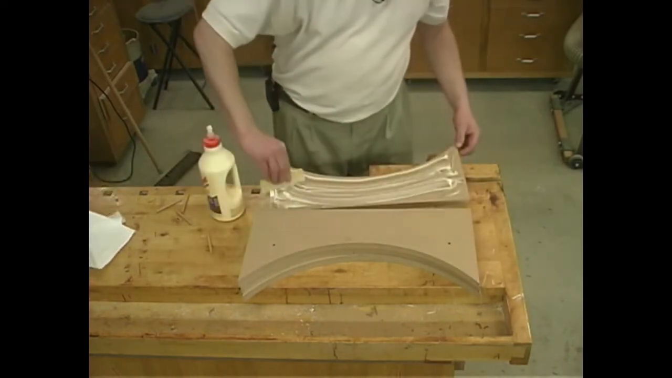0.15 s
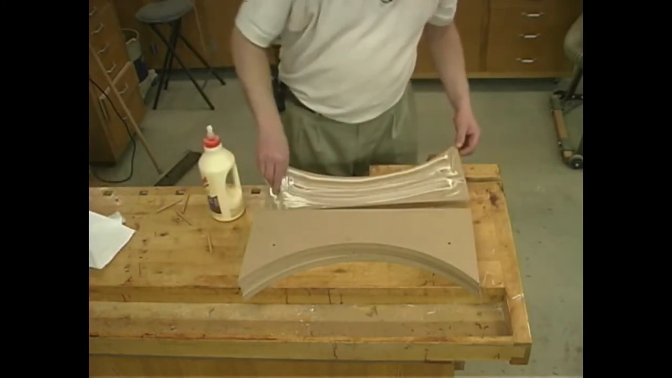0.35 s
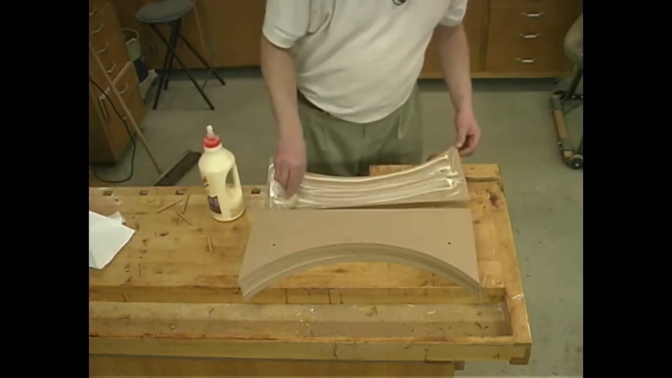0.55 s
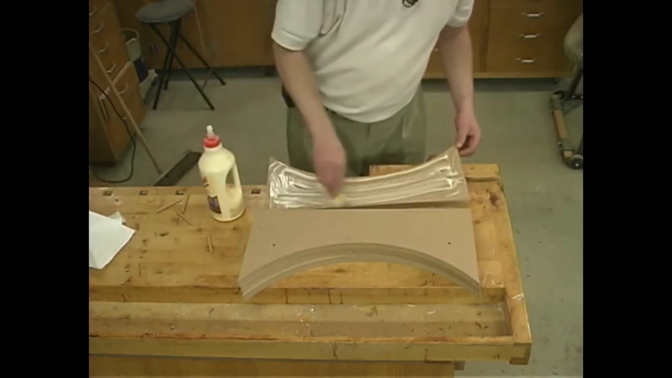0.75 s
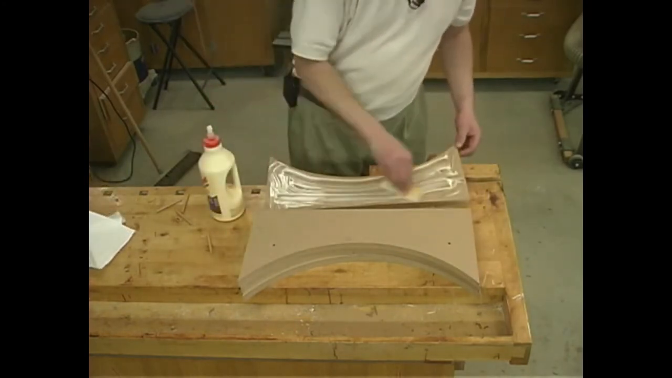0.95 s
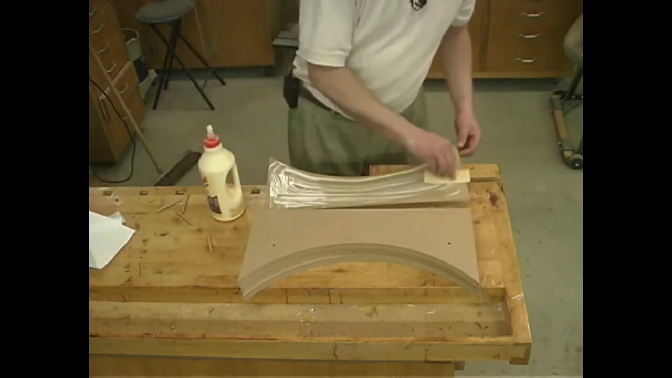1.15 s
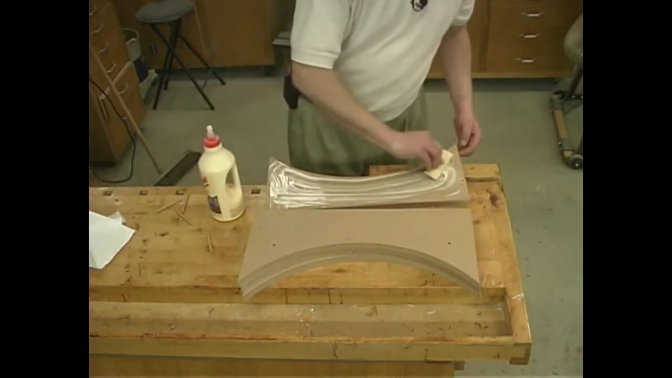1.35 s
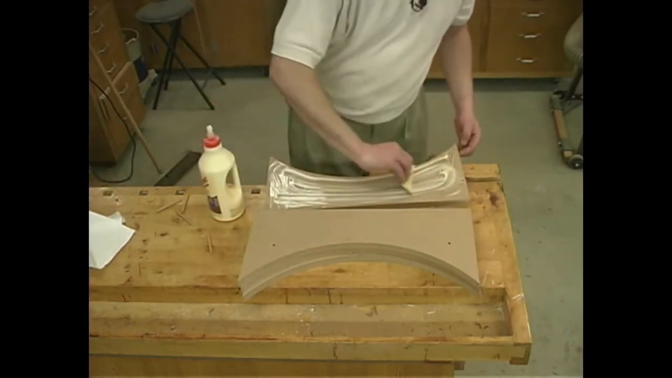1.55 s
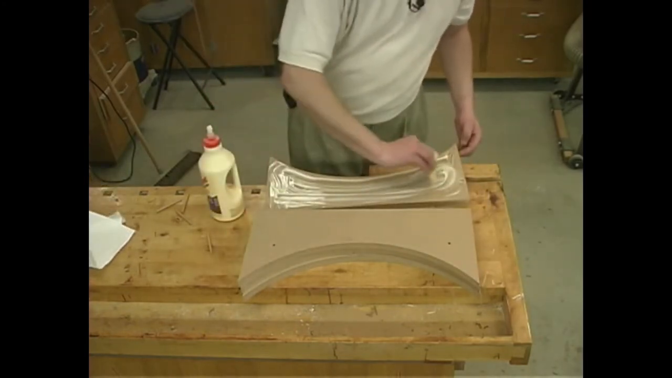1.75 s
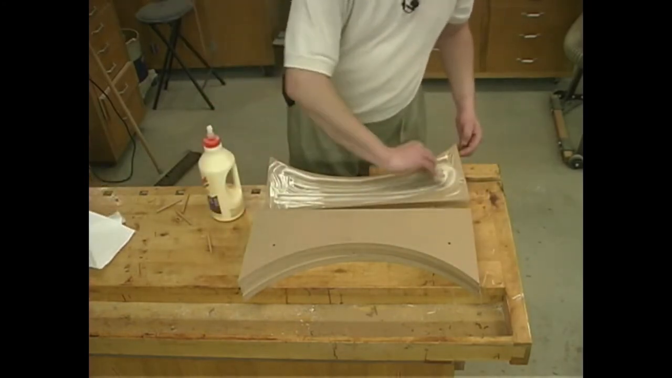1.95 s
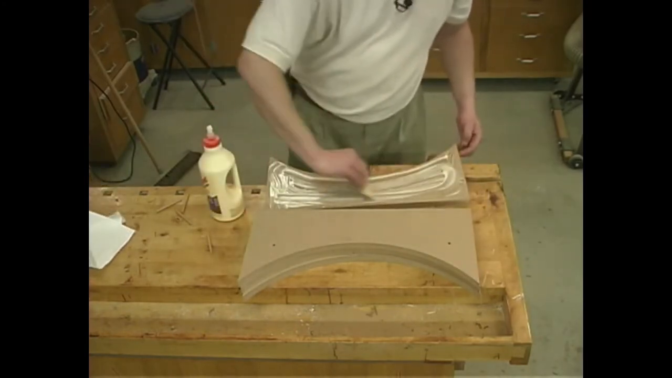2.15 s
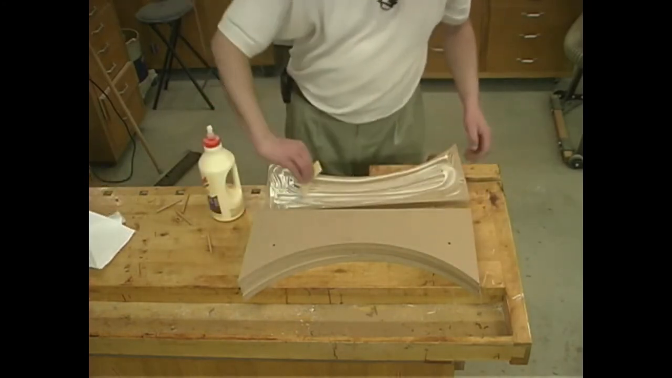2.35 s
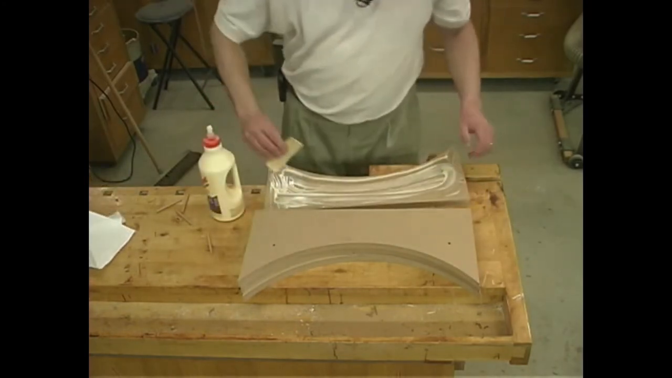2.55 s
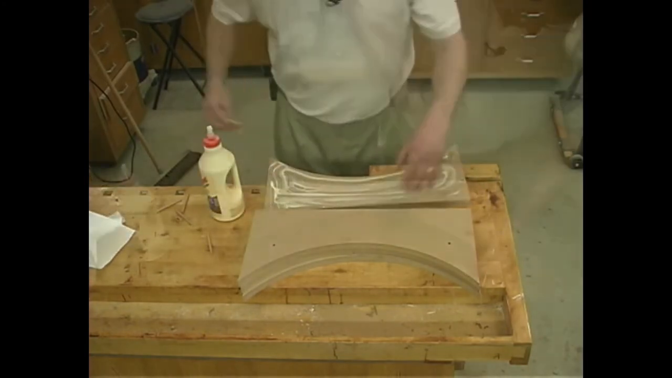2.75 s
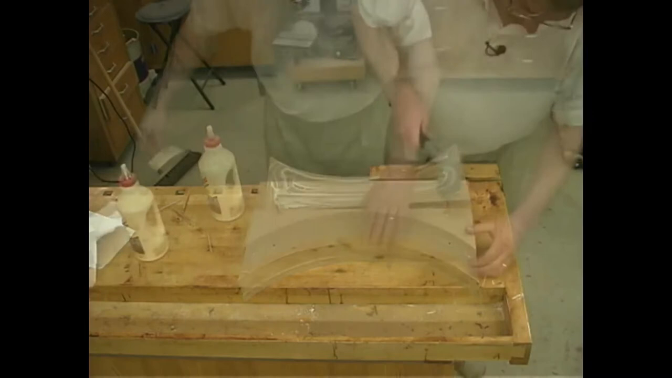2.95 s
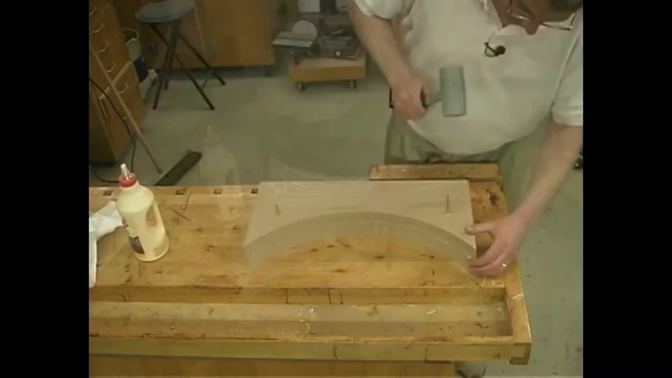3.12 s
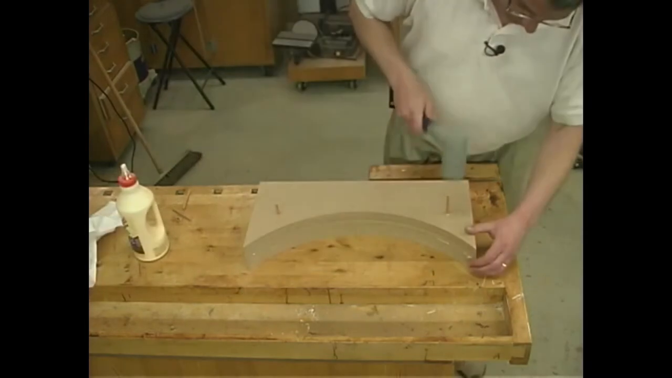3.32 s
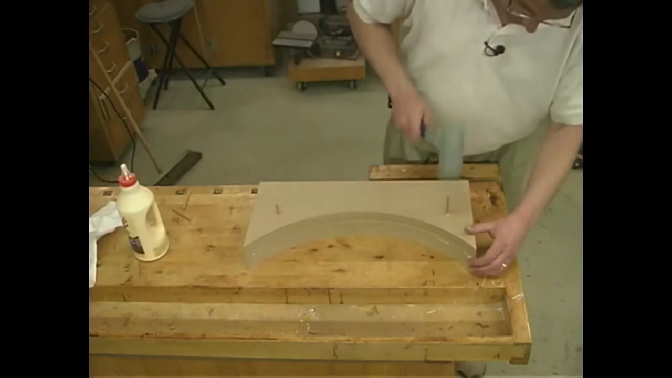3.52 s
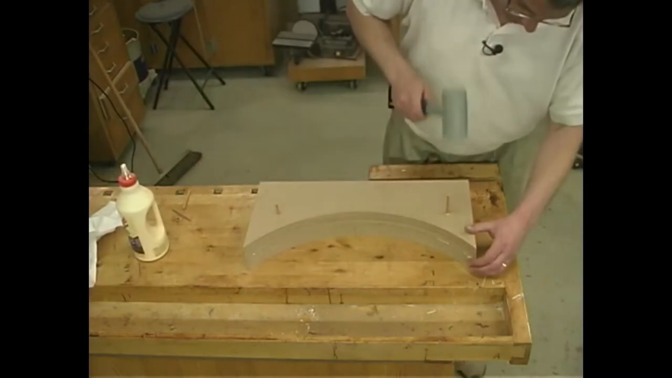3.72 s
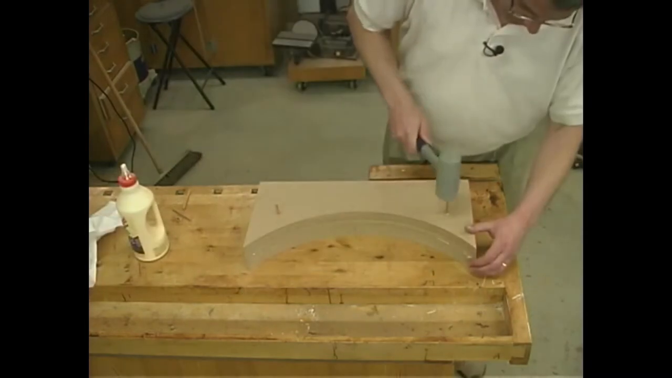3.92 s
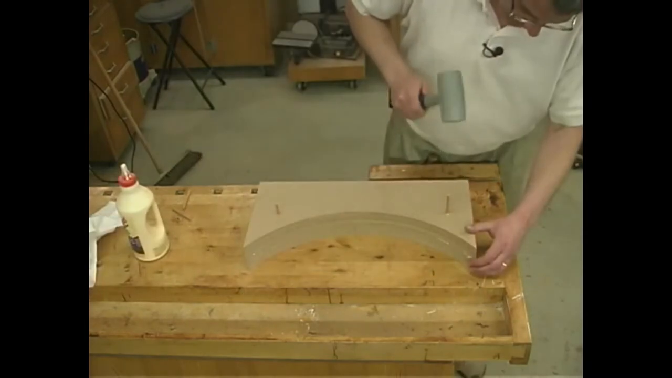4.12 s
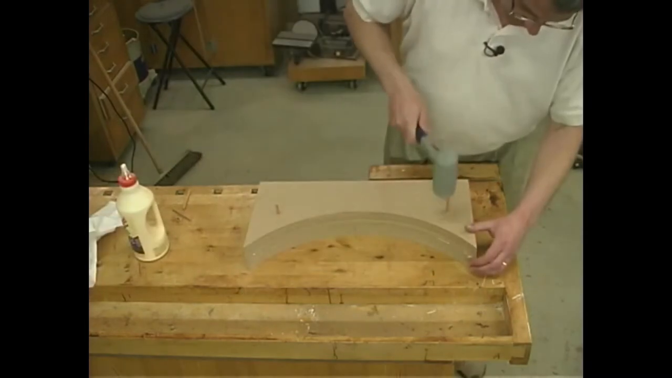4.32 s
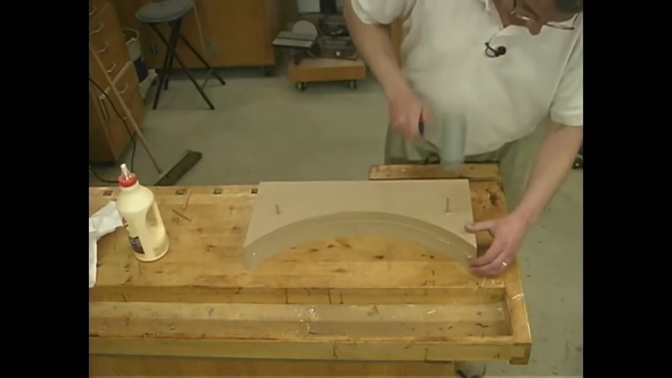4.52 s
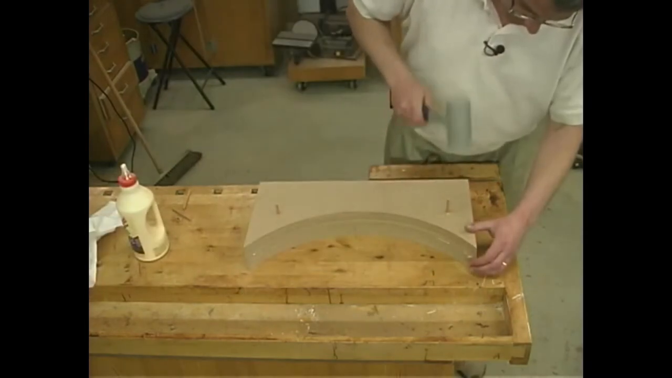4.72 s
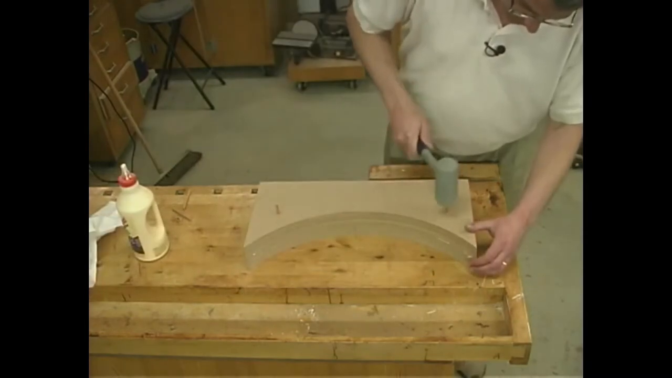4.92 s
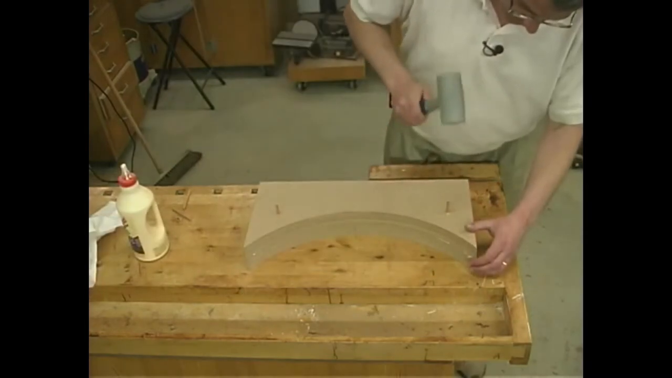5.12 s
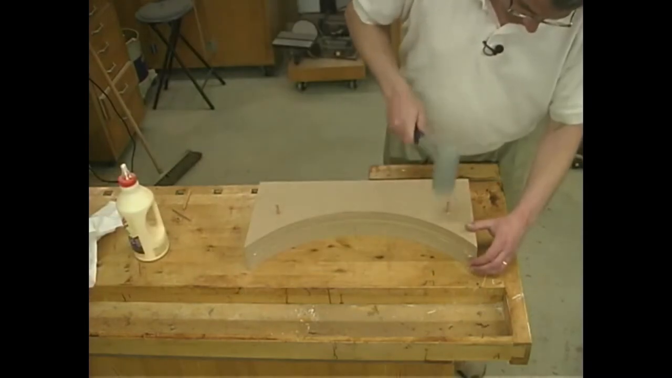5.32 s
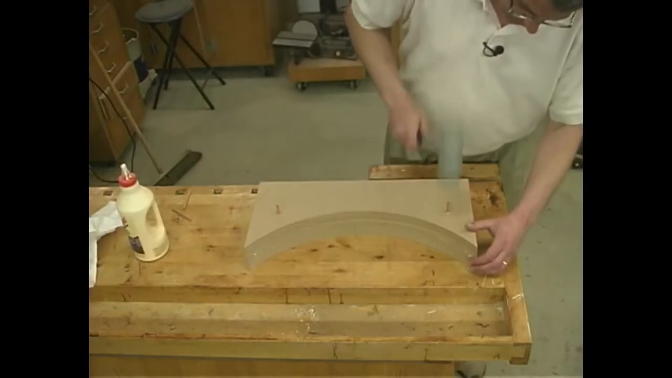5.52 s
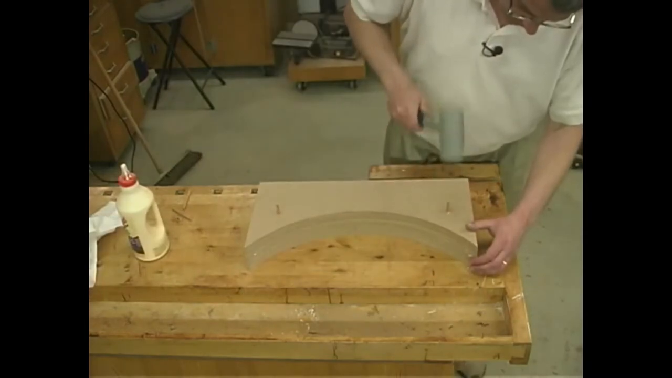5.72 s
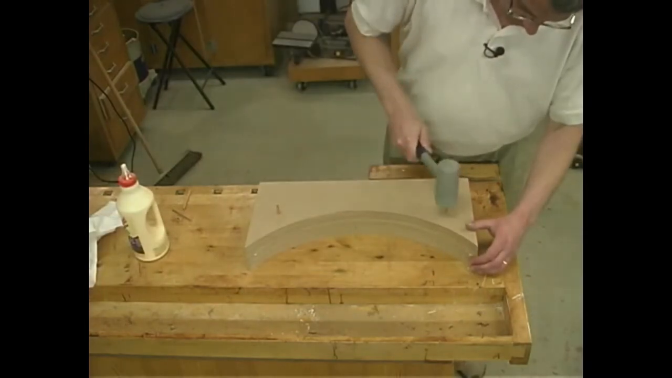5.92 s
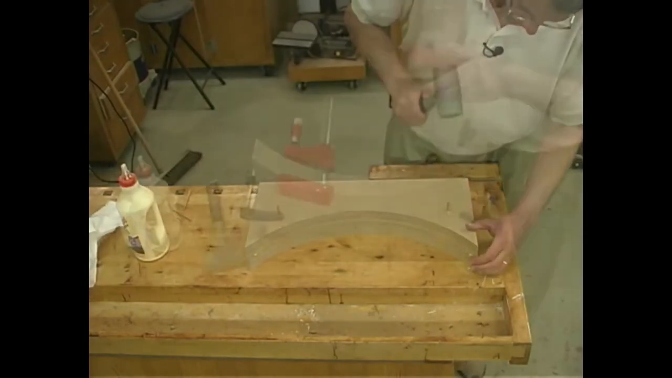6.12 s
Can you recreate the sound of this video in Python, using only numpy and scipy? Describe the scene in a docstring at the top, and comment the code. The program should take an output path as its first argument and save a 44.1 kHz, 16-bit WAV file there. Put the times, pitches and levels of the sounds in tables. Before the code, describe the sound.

After soft, sticky scraping on a board, a mallet knocks a wooden dowel home, about three sharp blows a second, in a bare workshop.

```python
"""A workshop, bare and echoing. A spreader swishes softly through glue on a board, its tiny sticky slips
ringing the blade, while the mains hum. Then a mallet drives a dowel into a stack of boards, three blows
a second: the mallet cracks, the dowel pings, the boards knock, the bench booms and the room answers.
The knock sinks as the dowel binds the stack, and a limiter holds down the hardest blows."""
import sys
import numpy as np
from scipy import signal
from scipy.fft import rfft, irfft, next_fast_len
from scipy.io import wavfile
from scipy.ndimage import uniform_filter1d

SR = 44100
rng = np.random.default_rng(int(sys.argv[2]) if len(sys.argv) > 2 else 0)


def digitize_waveform(pressure):
    """Quantize a signal to 16-bit integers and store it at the path in sys.argv[1].

    Rows of a 2-D input are taken as channels; values are limited to [-1, 1].
    """
    field = np.atleast_2d(pressure).T
    bounded = np.clip(field, -1, 1)
    quanta = np.round(bounded * 32767).astype(np.int16)
    wavfile.write(sys.argv[1], SR, quanta)


N = 271920
TIME = np.arange(N) / SR
AGE = TIME[:SR]   # the second that follows a blow
BOUND_KNOCK_HZ, ROOM_T60_S = 305.5, 0.8   # knock of the tightly bound stack; decay of the room


# Mallet hits: start_s, force_db, hardness_db, knock_hz, crack_db, ping_db
MALLET_HITS = [(2.638, -28, 3, 340, -40, -15), (2.9378, -19, -1, 359, 9, -18),
               (3.2683, -2.5, -15.5, 347, 3.5, 1), (3.5934, 1, -8, 329, -2.5, 9.5),
               (3.9324, -0.5, -0.5, 326, -4, 0.5), (4.2747, -8.5, 5, 341, 2.5, -36),
               (4.6041, -7.5, 2, 339, 2, -27), (4.9297, -2, -1, 335.6, -3, 3.5),
               (5.256, -.5, 0, 301, -5.5, -3), (5.594, -0.5, 1, 297.7, -3.5, -2),
               (5.9323, -1.5, 1, 297, -2, -2)]
# Bright resonances of mallet and dowel: pitch_hz, width_hz, gain_db
BRIGHT_RINGS = [(3090, 49, -9), (3544, 120, -3), (5050, 490, -9)]

def mallet(room_change=0.44, wood_db=-1.76, wood_follows_crack=0.14, ping_hz=2072):
    """Every blow wakes the same boards, bench and room; the room's answer shifts a little each time."""
    out = np.zeros((2, N + len(AGE)))
    room, rattle = room_tail(), board_rattle()
    room_side, crack_side = side_signal(room_tail()), side_signal(crack())
    for start_s, force_db, hardness_db, knock_hz, crack_db, ping_db in MALLET_HITS:
        room = np.sqrt(1 - room_change ** 2) * room + room_change * room_tail()
        wood = rattle + stack_knock(knock_hz) + wood_ring() + early_reflections()
        wood *= from_db(wood_db + wood_follows_crack * crack_db)
        mid = from_db(crack_db) * crack() + wood + room
        side = from_db(crack_db) * crack_side + room_side
        blow = coloured(stereo(mid, side), blow_colour(force_db, hardness_db, knock_hz))
        # A loose stack colours the whole blow at its knock pitch.
        stack_db = -16 + 45 * looseness(knock_hz)
        blow = with_resonance(blow, knock_hz, width_hz=22, gain_db=stack_db)
        blow = with_resonance(blow, ping_hz, width_hz=40, gain_db=ping_db)   # the dowel's short ping
        start = round(start_s * SR)
        out[:, start:start + len(AGE)] += blow
    for pitch_hz, width_hz, gain_db in BRIGHT_RINGS:
        out = with_resonance(out, pitch_hz, width_hz, gain_db)
    return out[:, :N]


def blow_colour(force_db, hardness_db, knock_hz, boom_hz=144, treble_hz=1120, clatter_hz=1180):
    """EQ of one blow: force sets the level, hardness the treble, a tightly bound stack the clatter."""
    hz = np.geomspace(25, 16000, 40)
    boom = 1 / (1 + (hz / boom_hz) ** 6)
    treble = 1 / (1 + (treble_hz / hz) ** 2)
    clatter = np.exp(-(np.log2(hz / clatter_hz) / 1.11) ** 2)
    clatter_db = -35.5 * looseness(knock_hz)
    body_db = force_db * (1 - 0.59 * boom)   # the bench's boom follows the force only in part
    return np.column_stack([hz, body_db + hardness_db * treble + clatter_db * clatter])


def looseness(knock_hz):
    """How loose the stack sounds: its knock in octaves above the bound pitch."""
    return np.log2(knock_hz / BOUND_KNOCK_HZ)


def stack_knock(pitch_hz):
    """The stack bounces on the bench; the tighter it is bound, the lower and weaker its knock."""
    return struck_mode(pitch_hz, level_db=-5 + 6 * looseness(pitch_hz), t60_s=0.09, swell_cycles=3.24)


# Tone of the mallet's crack: frequency_hz, gain_db
CRACK_EQ = [(200, -54), (700, -1), (1500, 12.5), (2200, -1.5), (3500, -1.5), (5500, -14), (9000, -21.5),
            (16000, -39.5)]

def crack(gain_db=8, contact_s=0.0052):
    """The mallet face presses on the end of the dowel for a few milliseconds."""
    contact = np.exp(-(AGE / contact_s) ** 2)
    return from_db(gain_db) * coloured(dense_ring(contact), CRACK_EQ)


# Strong modes of boards and bench: pitch_hz, level_db, t60_s
WOOD_MODES = [(63.6, -54, 0.26), (73.3, -32, 0.55), (118.7, -34, 0.46), (146.2, -17.5, 0.33),
              (161.1, -21, 0.42), (276.3, -19, 0.22), (317.4, -25.5, 0.9), (458, -31.5, 0.31),
              (497.6, -29, 0.34), (497, -8.5, 0.12), (532.5, -27.5, 0.35), (629, -16.5, 0.11),
              (658.5, -18.5, 0.32), (705, -25, 0.21), (842, -30.5, 0.3), (852, -17, 0.073),
              (963, -31, 0.83), (1032, -24, 0.23), (1136, -28.5, 0.32), (1203, -36.5, 0.95),
              (1325, -48.5, 0.53), (1440, -38, 0.61), (1426, -30, 0.73), (1667, -34, 1), (1713, -27, 0.11),
              (1890, -24.5, 0.044), (2082, -27, 0.14)]

def wood_ring():
    """Boards and bench ring in modes of alternating polarity, balanced a little differently each hit."""
    return sum((-1) ** k * struck_mode(pitch_hz, level_db + rng.normal(), t60_s, swell_cycles=0.17)
               for k, (pitch_hz, level_db, t60_s) in enumerate(WOOD_MODES))


# Tone of the boards' rattle: frequency_hz, gain_db
RATTLE_EQ = [(50, -33), (150, 7), (400, 8.5), (900, 7), (2000, 4.5), (2600, -6.5), (3700, -11), (6000, -23),
             (15000, -53.5)]

def board_rattle(gain_db=18, t60_s=0.13):
    """The crowded, short-lived modes of the stacked boards."""
    return from_db(gain_db) * coloured(dense_ring(decay(t60_s)), RATTLE_EQ)


# Pitched early reflections: delay_s, pitch_hz, level_db
PITCHED_ECHOES = [(0.058, 525, -17), (0.092, 620, -23), (0.1, 345, -25), (.13, 520, -28), (.165, 475, -32)]

def early_reflections(half_length_s=0.026, rise_hz_per_s=1100):
    """Reflections swell up just after the blow, each with a pitch of its own that bends upward."""
    out = 0
    for delay_s, pitch_hz, level_db in PITCHED_ECHOES:
        swell = np.exp(-((AGE - delay_s) / half_length_s) ** 2)
        cycles = pitch_hz * AGE + rise_hz_per_s * (AGE - delay_s) ** 2 / 2
        out += from_db(level_db) * swell * np.sin(2 * np.pi * cycles)
    return out


# Tone of the room's tail: frequency_hz, gain_db
ROOM_EQ = [(30, -22), (60, -7), (100, -12), (150, -2.5), (200, -1), (270, -4), (380, 0.5), (520, 4),
           (640, 4), (790, -2), (1000, 0), (2080, -9), (2400, -14.5), (3700, -19), (7500, -40),
           (15000, -61.5)]

def room_tail(gain_db=27, build_s=0.035):
    """The bare room's diffuse answer to a blow builds quickly and dies away."""
    envelope = decay(ROOM_T60_S) * (1 - np.exp(-AGE / build_s))
    return from_db(gain_db) * coloured(dense_ring(envelope), ROOM_EQ)


# Resonances of the spreader blade: pitch_hz, width_hz, gain_db
BLADE_RINGS = [(1620, 200, 7), (3170, 260, -2), (4470, 120, -7)]

def spreader(grain_db=4.0, reverb_db=-8):
    """Tiny sticky slips in the glue ring the blade, with the room behind."""
    slips = rng.standard_normal(N) * from_db(grain_db * np.minimum(rng.exponential(1, N), 5))
    blade = long_stroke(slips) + dabs(slips)
    for pitch_hz, width_hz, gain_db in BLADE_RINGS:
        blade = with_resonance(blade, pitch_hz, width_hz, gain_db)
    room_mid, room_side = [signal.fftconvolve(blade, dense_ring(decay(ROOM_T60_S)))[:N] for _ in range(2)]
    return blade + from_db(reverb_db) * stereo(room_mid, side_signal(room_side))


# Envelopes of the long stroke: time_s, swish_db, rasp_db
STROKE_LEVELS = [(0.945, -67, -80), (0.955, -72, -80), (0.967, -60.5, -55.5), (1.011, -59, -54),
                 (1.031, -60.5, -61), (1.067, -50.5, -57.5), (1.099, -58.5, -69), (1.155, -60, -60),
                 (1.21, -70, -80)]
# Tones of the low swish and the high rasp: frequency_hz, gain_db
SWISH_EQ = [(500, -29), (1000, -3.5), (1500, -2), (2800, 6.5), (3800, -18), (8000, -41)]
RASP_EQ = [(1500, -33), (3300, 2), (4600, 6.5), (5300, -5), (6500, -7), (7600, -4.5), (8800, -19),
           (15000, -38)]

def long_stroke(slips, swish_trim_db=-2.5, rasp_trim_db=-1.5, fade_s=0.02):
    """The blade bites with a high rasp, then glides on through the glue with a lower swish."""
    time_s, swish_db, rasp_db = np.transpose(STROKE_LEVELS)
    start_s, end_s = time_s[0], time_s[-1]
    contact = np.interp(TIME, [start_s - fade_s, start_s, end_s, end_s + fade_s], [0, 1, 1, 0])
    swish = from_db(swish_trim_db + np.interp(TIME, time_s, swish_db)) * unit_rms(coloured(slips, SWISH_EQ))
    rasp = from_db(rasp_trim_db + np.interp(TIME, time_s, rasp_db)) * unit_rms(coloured(slips, RASP_EQ))
    return contact * (swish + rasp)


# Light dabs of the blade: peak_s, level_db, half_length_s, centre_hz
GLUE_DABS = [(0.482, -56, 0.0043, 600), (0.488, -58, 0.0066, 2130), (0.741, -59, 0.002, 2130),
             (0.79, -61.5, 0.017, 2900), (.88, -72, 0.072, 2400), (1.332, -64, .014, 3780),
             (1.408, -67.5, .025, 3300), (1.525, -66, 0.005, 1730), (1.609, -64, 0.017, 1650),
             (1.625, -55, 0.0013, 1480), (2.195, -71.5, 0.22, 2080), (2.246, -55, 0.026, 3020)]

def dabs(slips, trim_db=-3.0):
    """Each short touch sounds the slips in the octave band that its contact favours."""
    out = np.zeros(N)
    for peak_s, level_db, half_length_s, centre_hz in GLUE_DABS:
        near = abs(TIME - peak_s) < 0.25
        band = signal.butter(3, centre_hz * 2 ** np.array([-0.5, 0.5]), "band", fs=SR, output="sos")
        pressure = from_db(level_db + trim_db) * np.exp(-((TIME[near] - peak_s) / half_length_s) ** 2)
        out[near] += pressure * unit_rms(signal.sosfilt(band, slips[near]))
    return out


# Envelope of the hands' rustle: time_s, level_db
RUSTLE_LEVELS = [(0.0, -69.5), (0.46, -90), (0.48, -64), (0.55, -83.5), (1.44, -64), (1.49, -84.5),
                 (2.45, -63), (2.6, -62.5)]
# Tone of the rustle: frequency_hz, gain_db
RUSTLE_EQ = [(50, 6.5), (150, 0.5), (330, 7.5), (700, -4), (1800, -8.5), (4000, -20), (9000, -59)]

def hands(fade_from_s=3.3, release_s=0.4):
    """Hands rustle softly on the board, dying away once the hammering is under way."""
    release = np.exp(-np.maximum(TIME - fade_from_s, 0) / release_s)
    return fader(RUSTLE_LEVELS) * release * noise(RUSTLE_EQ)


# Mains hum partials: pitch_hz, level_db
HUM_PARTIALS = [(59.5, -84.5), (241, -81.5), (360.4, -80.5), (420, -86), (479.4, -78), (539, -89),
                (721, -87), (959, -88)]

def mains_hum():
    """The mains hum in steady tones near multiples of 60 Hz."""
    return sum(from_db(level_db) * np.sqrt(2) * np.sin(2 * np.pi * (pitch_hz * TIME + rng.random()))
               for pitch_hz, level_db in HUM_PARTIALS)


# Tone of the air, at the centre and at the sides: frequency_hz, gain_db
AIR_MID_EQ = [(25, 1.5), (48, -1), (86, -2), (170, -14), (330, -17.5), (520, -20), (800, -19.5),
              (1150, -23.5), (1650, -22.5), (2200, -26), (3500, -24), (6000, -26), (8000, -23.5),
              (15500, -24.5)]
AIR_SIDE_EQ = [(30, -1.5), (100, -1), (250, -6), (500, -5), (620, 1), (750, -7), (2000, -6), (7000, -6),
               (8200, -37), (15000, -47)]
# Envelope of the air at the centre: time_s, level_db
AIR_LEVELS = [(0, -65.5), (3.15, -65), (3.25, -70), (6.17, -69)]

def room_air(side_db=-75.5):
    """Room air and microphone hiss; the centre drops a little at 3.2 s."""
    return stereo(fader(AIR_LEVELS) * noise(AIR_MID_EQ), from_db(side_db) * noise(AIR_SIDE_EQ))


# Stereo width of crack and room: frequency_hz, side_db
WIDTH_EQ = [(100, -49), (1000, -47.5), (2200, -17.5), (4000, -17), (8000, -9), (15000, -29)]

def side_signal(x):
    """The part that differs between left and right, mostly treble."""
    return coloured(x, WIDTH_EQ)


def stereo(mid, side):
    """Mid and side to left and right."""
    return mid + side * [[1], [-1]]


def from_db(db):
    """Decibels to gain."""
    return 10 ** (np.asarray(db) / 20)


def unit_rms(x):
    """Scale to unit rms."""
    return x / np.sqrt(np.mean(x ** 2) + 1e-20)


def fader(points):
    """Gain over the scene from rows of time_s, level_db."""
    return from_db(np.interp(TIME, *np.transpose(points)))


def decay(t60_s):
    """Exponential decay after a blow."""
    return from_db(-60 * AGE / t60_s)


def noise(eq):
    """Steady coloured noise at unit rms."""
    return unit_rms(coloured(rng.standard_normal(N), eq))


def struck_mode(pitch_hz, level_db, t60_s, swell_cycles):
    """One struck mode: it swells over its first cycles and dies."""
    swell = 1 - np.exp(-AGE * pitch_hz / swell_cycles)
    return from_db(level_db) * swell * decay(t60_s) * np.sin(2 * np.pi * pitch_hz * AGE)


def dense_ring(envelope, smooth_bins=61):
    """Countless overlapping modes under one envelope, their unit energy spread evenly over pitch."""
    burst = rng.standard_normal(len(AGE)) * envelope
    power = uniform_filter1d(abs(rfft(burst)) ** 2, smooth_bins)
    return causal_filter(burst, power ** -0.5)


def with_resonance(x, pitch_hz, width_hz, gain_db):
    """Add to a sound the ring of one resonance that it drives."""
    radius = np.exp(-np.pi * width_hz / SR)
    feedforward = np.array([1, 0, -1]) * (1 - radius ** 2) / 2
    feedback = [1, -2 * radius * np.cos(2 * np.pi * pitch_hz / SR), radius ** 2]
    return x + from_db(gain_db) * signal.lfilter(feedforward, feedback, x)


def coloured(x, eq):
    """Filter by an EQ curve with rows of frequency_hz, gain_db."""
    frequency_hz, gain_db = np.transpose(eq)
    bins_hz = np.linspace(1, SR / 2, next_fast_len(x.shape[-1] // 2 + 4096) + 1)
    return causal_filter(x, from_db(np.interp(np.log(bins_hz), np.log(frequency_hz), gain_db)))


def causal_filter(x, gain):
    """Minimum-phase filter with the given gain per frequency bin: nothing sounds early."""
    size = 2 * (len(gain) - 1)
    cepstrum = irfft(np.log(gain + 1e-12))
    cepstrum[1:size // 2] *= 2
    cepstrum[size // 2 + 1:] = 0
    return irfft(rfft(x, size) * np.exp(rfft(cepstrum)))[..., :x.shape[-1]]


def scene(mallet_db=0.5):
    """The whole workshop, a shade louder on the right."""
    mix = from_db(mallet_db) * mallet() + spreader() + room_air() + mains_hum() + hands()
    return mix * from_db([[-0.25], [0.25]])


def limiter(x, ceiling_db=-4.0, release_db_per_s=55, attack_s=0.0031):
    """Peaks over the ceiling pull the gain down fast; it recovers steadily."""
    over_db = np.maximum(20 * np.log10(abs(x).max(axis=0) + 1e-9) - ceiling_db, 0)
    recovery_db = release_db_per_s * TIME
    held_db = np.maximum.accumulate(over_db + recovery_db) - recovery_db
    pole = np.exp(-1 / (attack_s * SR))
    return x * from_db(-signal.lfilter([1 - pole], [1, -pole], held_db))


def record(dry, clip_level=0.96, cutoff_hz=16000):
    """Limiter, softly rounded peaks and a steep cut of the top end."""
    rounded = clip_level * np.tanh(limiter(dry) / clip_level)
    return signal.sosfilt(signal.ellip(12, 0.1, 100, cutoff_hz, fs=SR, output="sos"), rounded)


dry = scene()
out = record(dry)
digitize_waveform(out)
```